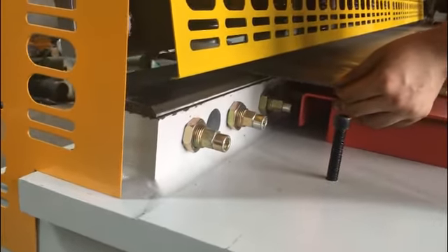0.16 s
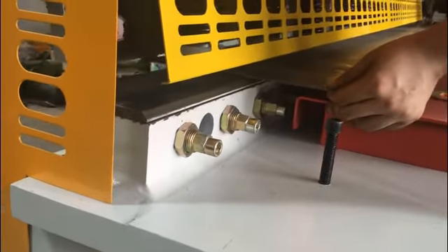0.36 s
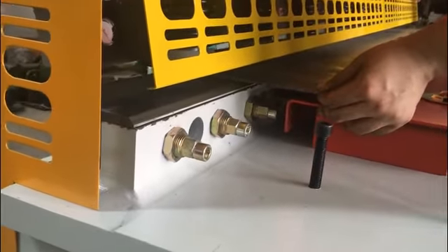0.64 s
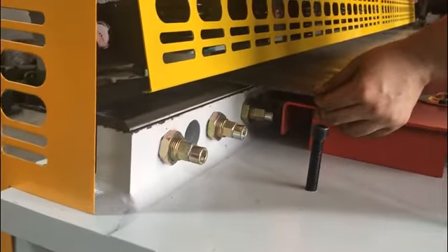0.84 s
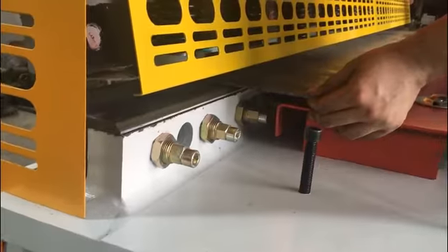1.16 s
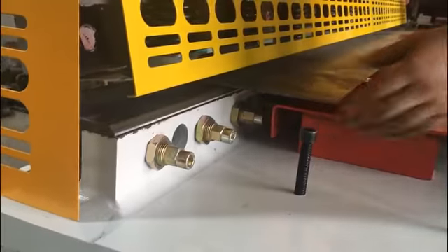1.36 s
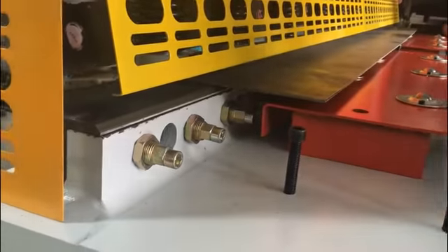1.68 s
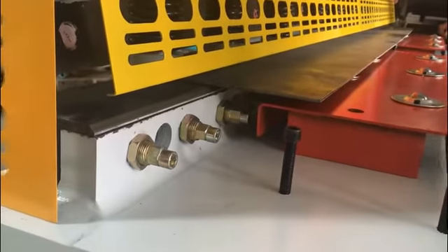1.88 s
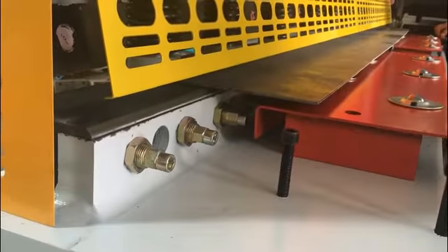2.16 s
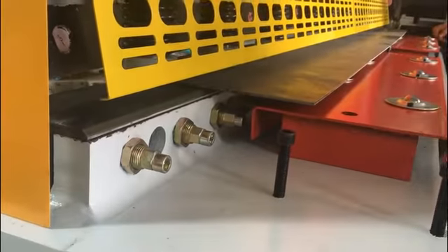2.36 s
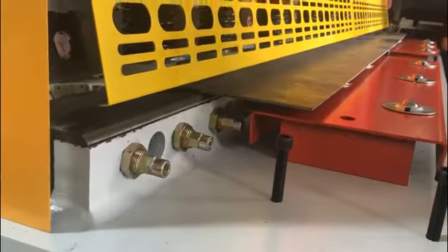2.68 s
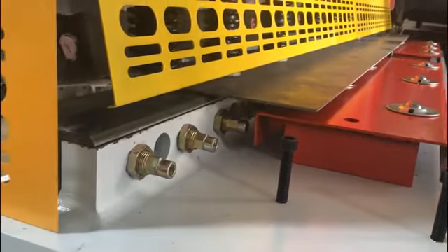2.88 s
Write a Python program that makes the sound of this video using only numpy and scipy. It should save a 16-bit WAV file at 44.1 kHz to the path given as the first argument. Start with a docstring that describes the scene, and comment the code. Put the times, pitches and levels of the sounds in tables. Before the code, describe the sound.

Close, almost mono workshop sound of a hydraulic metal shear: the motor drones with a fast throb, a valve opens with rushing oil and low frame boom, the pump strains louder, then clamps and blade slam the steel.

```python
"""A hydraulic guillotine shear runs in a workshop, heard close up and almost in mono.
Shaft orders of the pump hum and throb once a turn, over steady whine and noise; bursts of noise scuff the sheet.
A valve opens: shaped noise gives the oil rush and the ram's rumble, and an unsteady tone makes the frame boom.
The pump takes up the load, a few short modes tick, then clamps and blade strike the steel:
a loud crash of cracks, noise and ringing modes."""
import sys
import numpy as np
from scipy.fft import rfft, irfft, next_fast_len
from scipy.io import wavfile
from scipy.ndimage import map_coordinates

SR = 44100
rng = np.random.default_rng(int(sys.argv[2]) if len(sys.argv) > 2 else 0)


def dump(signal):
    """Clip the signal to [-1, 1] and save it as 16-bit WAV at the path in sys.argv[1]."""
    limited = np.clip(np.atleast_2d(signal).T, -1, 1)
    pcm = np.round(limited * 32767).astype(np.int16)
    wavfile.write(sys.argv[1], SR, pcm)


N = 133623

# Pump tone with its once-a-turn sidebands. Each entry: level in dB, for consecutive shaft orders from 11.
PUMP_ORDERS = [-45.5, -31.5, -29, -42.5]
# Octave of the pump tone with its sidebands. Each entry: level in dB, for consecutive shaft orders from 24.
OCTAVE_ORDERS = [-53, -43.5, -29.5, -41.5, -51.5]
# Weak shaft orders of the casing. Each row: multiple of the shaft rate, relative level in dB.
CASING_ORDERS = [(2, -14.5), (3, -16.5), (4, -15.5), (6, -19), (7, -20.5), (8, -20), (16, -21), (17, -16),
                 (20, -22.5), (21, -19), (29, -17.5), (30, -21), (31, -20), (32, -18), (33, -23.5),
                 (35, -21.5), (36, -21.5)]
# Motor whine. Each row: frequency in Hz, level in dB.
WHINE_LINES = [(509, -47.5), (574, -50), (604, -45), (679, -40.5), (709, -51), (910, -51.5), (1222, -48),
               (1394, -48.5), (1480, -60), (1572, -61), (1620, -55.5), (1696, -56), (1744, -60.5),
               (1922, -52.5), (2116, -58.5), (2180, -57), (2449, -63), (2536, -62), (3494, -60)]
# Noise spectrum of the idling machine. Each row: frequency in Hz, relative level in dB per Hz.
IDLE_SPECTRUM = [(20, -29.5), (32, -12.5), (55, -5.5), (95, 0.5), (125, -6.5), (170, -16.5), (300, -8),
                 (460, -15.5), (560, -11), (780, -10.5), (1100, -20.5), (2000, -25.5), (3000, -31.5),
                 (4200, -36), (4950, -41.5), (5800, -37), (7200, -45.5), (8500, -68.5), (15000, -85)]
# Scuffs of the sheet on the table. Each row: start in seconds, attack in seconds, T60 in seconds, level in dB.
SCUFF_EVENTS = [(.125, 0.019, 0.16, -39), (1.07, 0.015, 0.16, -47), (1.883, .004, 0.077, -39),
                (1.962, .004, .08, -39.5), (2.095, .01, 0.14, -38.5), (2.285, .008, 0.094, -44.5),
                (2.43, 0.018, 0.2, -37), (2.603, 0.0049, .1, -30.5), (2.626, 0.005, 0.065, -34.5)]
# Noise spectrum of the scuffs. Each row: frequency in Hz, relative level in dB.
SCUFF_SPECTRUM = [(1500, -19), (4200, 3.5), (6300, -4), (9000, -3.5), (10500, -11), (12500, -7.5),
                  (15500, -24.5)]
# Modes of the small steel contact. Each row: frequency in Hz, relative level in dB, T60 in seconds.
CONTACT_MODES = [(5840, 0, 0.0084), (6070, 4.5, 0.0075), (6350, -4.5, 0.0093), (8400, -7, 0.011),
                 (11720, -17, 0.025), (12460, -14, .015), (12950, -18.5, 0.029)]
# Noise spectrum of the oil flow. Each row: frequency in Hz, relative level in dB per Hz.
OIL_SPECTRUM = [(300, -6.5), (800, 2), (1100, -1), (1700, -0.5), (2600, -10), (3700, -14), (4500, -15),
                (4950, -23), (5600, -18.5), (6500, -19.5), (7700, -28), (9000, -25), (10500, -45),
                (13000, -61), (15500, -70.5)]
# Surges of oil through the valve. Each row: time in seconds, relative level in dB.
FLOW_SURGES = [(1.70, -35.5), (1.78, -35), (1.85, -35), (1.87, -34), (1.92, -35.5), (1.98, -33),
               (2.11, -35), (2.15, -32.5), (2.2, -34.5), (2.32, -33), (2.53, -35), (2.67, -32.5),
               (2.75, -34.5), (2.8, -34), (2.96, -36)]
# Noise spectrum of the frame rumble. Each row: frequency in Hz, relative level in dB per Hz.
RUMBLE_SPECTRUM = [(22, -35), (35, -11), (60, -2.5), (100, -2.5), (145, -5), (185, -7.5), (260, -7),
                   (500, -23), (1200, -66.5)]
# Blows of clamps and blade. Each row: start in seconds, relative level in dB, pitch of the crack in Hz.
CUT_BLOWS = [(2.9826, 1.5, 3860), (2.991, 0, 4700), (3, -6, 2190), (3.015, -6.5, 2000)]
# Modes of the sheet and frame. Each row: frequency in Hz, relative level in dB.
STEEL_MODES = [(336, -9), (505, -2.5), (575, -7), (890, 4.5), (1160, -1.5), (1222, 0), (1410, -8.5),
               (1604, -1), (1650, -3), (1691, -4), (1943, 2.5), (2121, 6.5), (2238, -0.5), (2268, -1.5),
               (2925, -5), (3325, -5), (4420, -2.5), (4577, -11), (5270, -6), (5590, -8), (6200, -8.5),
               (6310, -5.5)]
# Noise spectrum of the long clang. Each row: frequency in Hz, relative level in dB.
CLANG_SPECTRUM = [(100, -14), (400, -3.5), (750, -1.5), (1020, -5.5), (1400, -5.5), (2100, 4), (2900, -7),
                  (4200, -4), (5500, -13.5), (8000, -17), (15000, -50)]
# Noise spectrum of the short bright crash. Each row: frequency in Hz, relative level in dB.
CRASH_SPECTRUM = [(1000, -26.5), (2800, 2), (4200, -4), (6200, -4), (7000, -11.5), (9500, -14),
                  (11000, -19), (13000, -19), (15500, -29.5)]

SHAFT_HZ = 24.938
RAM_S, RAM_RISE_S = 1.704, 0.14  # the ram starts to move
LOAD_S, LOAD_RISE_S = 2.57, 0.42  # the pump takes up the load and the ram slows


def amp(db):
    """Decibels to gain."""
    return 10 ** (np.asarray(db) / 20)


def unit(x):
    """Scale to rms 1."""
    return x / np.sqrt(np.mean(x ** 2) + 1e-20)


def clock():
    """Time of each sample in seconds."""
    return np.arange(N) / SR


def ramp(start, length):
    """Rises in a straight line from 0 to 1, then stays there."""
    return np.clip((clock() - start) / length, 0, 1)


def wobble(rate):
    """A smooth random curve through `rate` knots a second."""
    knots = rng.standard_normal(int(N * rate / SR) + 4)
    return map_coordinates(knots, [clock() * rate])


def filtered(x, response):
    """Shape the spectrum of x by a response of frequency."""
    m = next_fast_len(N + 8192)
    spectrum = rfft(x, m) * response(np.fft.rfftfreq(m, 1 / SR))
    return irfft(spectrum, m)[..., :N]


def noise(points):
    """Noise of rms 1 whose spectrum joins (Hz, dB) points along a log frequency axis."""
    f, db = np.transpose(points)

    def response(hz):
        return amp(np.interp(np.log(hz + 1), np.log(f), db))

    return unit(filtered(rng.standard_normal(N), response))


def resonance(centre_hz, width_hz):
    """Noise of rms 1 in one resonance, down to half amplitude at the edges of its width."""
    def response(hz):
        return 1 / (1 + (2 * (hz - centre_hz) / width_hz) ** 2)

    return unit(filtered(rng.standard_normal(N), response))


def tone(hz, unsteady):
    """A sine of rms 1 whose phase wanders by `unsteady` radians."""
    phase = 2 * np.pi * (hz * clock() + rng.random()) + unsteady * wobble(6)
    return np.sqrt(2) * np.sin(phase)


def struck(start, attack, t60):
    """Envelope of a blow: a quick rise, then an exponential decay of 60 dB in t60 seconds."""
    t = np.maximum(clock() - start, 0)
    decay = np.exp(-np.minimum(np.log(1000) * t / t60, 20))
    return (1 - np.exp(-t / attack)) * decay


def throb(levels_db, crest_s, flutter_db, order):
    """Neighbouring shaft orders come into step, and so swell together, once a turn."""
    turn = 2 * np.pi * SHAFT_HZ * (clock() - crest_s)
    start = 2 * np.pi * rng.random()
    total = np.zeros(N)
    for k, db in enumerate(levels_db):
        total += amp(db + flutter_db * wobble(7)) * np.cos((order + k) * turn + start)
    return np.sqrt(2) * total


def pump():
    """Throbbing hum and housing resonance follow the load, over casing lines, motor whine and running noise."""
    hum = throb(PUMP_ORDERS, crest_s=0.01105, flutter_db=0.1, order=11)
    hum += throb(OCTAVE_ORDERS, crest_s=0.022, flutter_db=0.0, order=24)
    housing = amp(-35.5) * resonance(660.5, width_hz=39)
    casing = amp(-31.5) * sum(amp(db) * tone(k * SHAFT_HZ, unsteady=0.61) for k, db in CASING_ORDERS)
    whine = sum(amp(db) * tone(hz, unsteady=0.11) for hz, db in WHINE_LINES)
    running = amp(-30 + 0.48 * wobble(11)) * noise(IDLE_SPECTRUM)
    # the hum sags a little as the ram sets off, then swells under load
    sag_db, load_db = -1, 6.5
    hum_db = sag_db * ramp(RAM_S, RAM_RISE_S) + load_db * ramp(LOAD_S, LOAD_RISE_S)
    return (hum + housing) * amp(hum_db) + casing + whine + running


def sheet():
    """Grainy noise scuffs as the sheet rubs the table, then damped modes and a crack tick, steel on steel."""
    rub = sum(amp(db) * struck(start, attack, t60) for start, attack, t60, db in SCUFF_EVENTS)
    scuffs = rub * unit(noise(SCUFF_SPECTRUM) * amp(2 * wobble(400)))
    tick_s, tick_db = 2.8172, -14
    since = clock() - tick_s
    ring = np.zeros(N)
    for hz, db, t60 in CONTACT_MODES:
        ring += amp(db) * struck(tick_s, 0.00044, t60) * np.sin(2 * np.pi * hz * since)
    crack = amp(-11.02) * struck(tick_s, 0.0004, t60=0.025) * noise(SCUFF_SPECTRUM)
    return scuffs + amp(tick_db) * (ring + crack)


def stroke():
    """Oil surges through the valve; the moving ram rumbles and booms the frame, softer as it slows."""
    flow_db = 2 + np.interp(clock(), *np.transpose(FLOW_SURGES)) + 0.6 * wobble(35.06)
    oil = ramp(1.69, length=0.0096) * amp(flow_db) * noise(OIL_SPECTRUM)
    slowing_db = -5.5 * ramp(LOAD_S, LOAD_RISE_S)
    speed = amp(slowing_db + 0.58 * wobble(9.8))
    # the ram judders as it slides, so the rumble is lumpy
    judder = amp(1.8 * wobble(22.1))
    rumble = ramp(RAM_S, RAM_RISE_S) * amp(-26) * unit(noise(RUMBLE_SPECTRUM) * judder)
    frame_hz, frame_db, fade_db_per_s = 143.1, -29, 4.5
    boom_db = frame_db - fade_db_per_s * (clock() - RAM_S)
    boom = ramp(RAM_S, length=0.13) * amp(boom_db + 2.2 * wobble(18)) * tone(frame_hz, unsteady=2.58)
    return oil + speed * (rumble + boom)


def cut():
    """Each blow cracks, crashes and clangs in noise, and adds its energy to the ringing of sheet and frame."""
    impacts, energy = np.zeros(N), np.zeros(N)
    for start, db, crack_hz in CUT_BLOWS:
        blow = amp(db)
        energy += (blow * struck(start, attack=0.0064, t60=0.61)) ** 2
        clang = amp(-19) * struck(start, attack=0.0035, t60=0.91) * noise(CLANG_SPECTRUM)
        crash = amp(-14.5) * struck(start, attack=0.0006, t60=0.18) * noise(CRASH_SPECTRUM)
        crack = amp(-10.5) * struck(start, attack=0.0003, t60=0.015) * resonance(crack_hz, width_hz=800)
        impacts += blow * (clang + crash + crack)
    ring = sum(amp(level) * tone(hz, unsteady=0.37) for hz, level in STEEL_MODES)
    return impacts + amp(-25.5) * np.sqrt(energy) * ring


def scene():
    """All of it arrives from the front; a quarter-cycle side signal shifts only the treble between the sides."""
    mid = pump() + sheet() + stroke() + cut()
    side_db, side_from_hz = -30, 2000

    def treble(hz):
        return 1j * hz ** 6 / (hz ** 6 + side_from_hz ** 6)

    side = amp(side_db) * filtered(mid, treble)
    return np.array([mid + side, mid - side])


def record(dry):
    """The recorder rounds off the highest peaks and keeps nothing above its band limit."""
    headroom, top_hz = 1.0, 15850  # full scale, Hz
    rounded = dry / (1 + (dry / headroom) ** 6) ** (1 / 6)
    return filtered(rounded, lambda hz: hz < top_hz)


dry = scene()
out = record(dry)
dump(out)
```